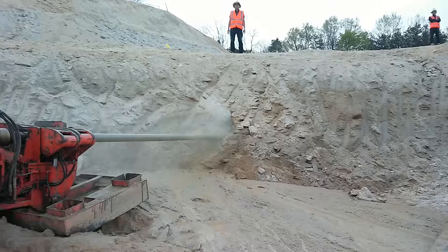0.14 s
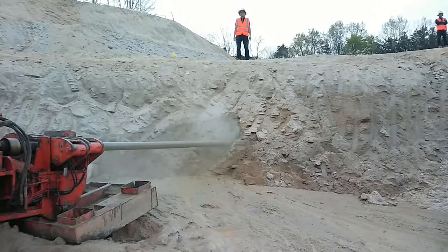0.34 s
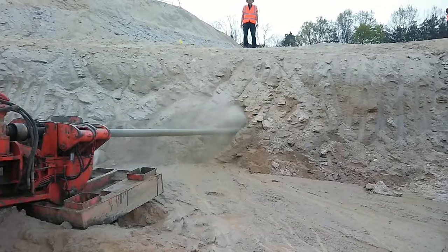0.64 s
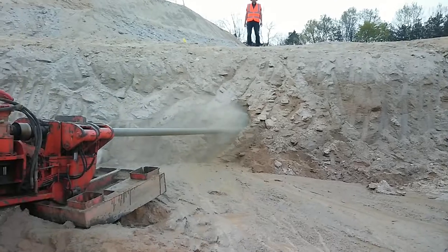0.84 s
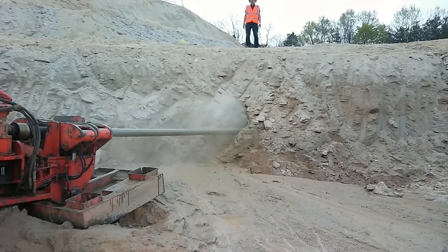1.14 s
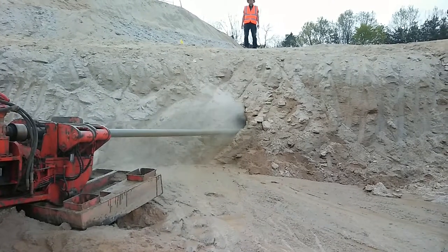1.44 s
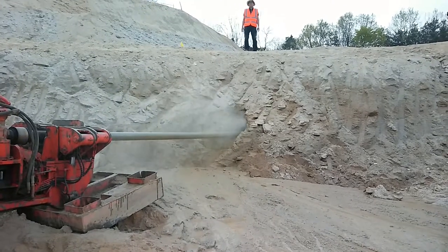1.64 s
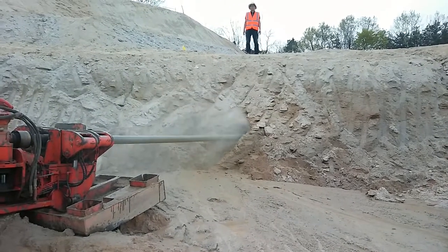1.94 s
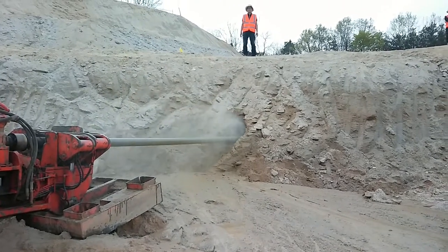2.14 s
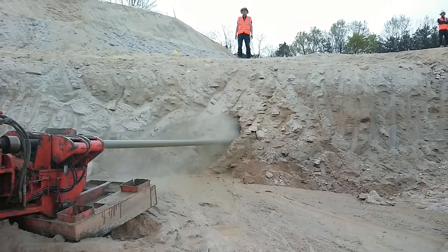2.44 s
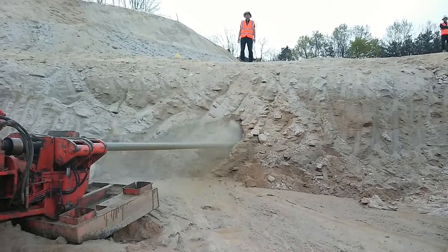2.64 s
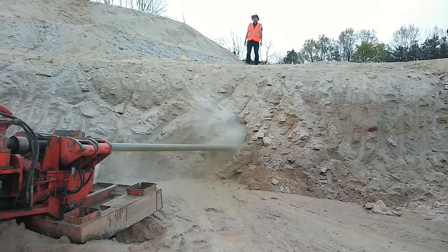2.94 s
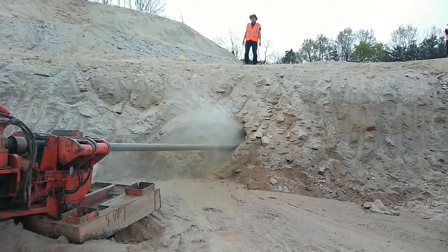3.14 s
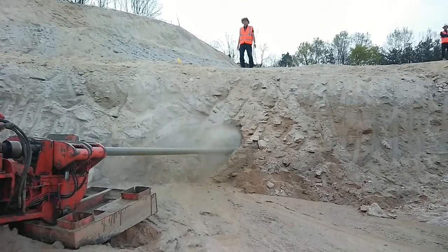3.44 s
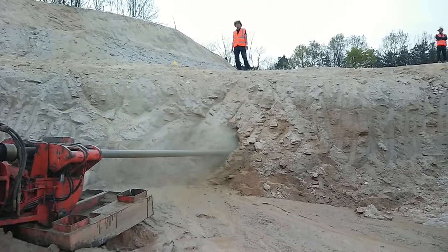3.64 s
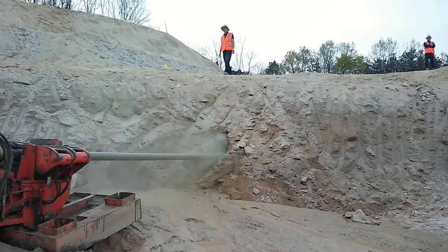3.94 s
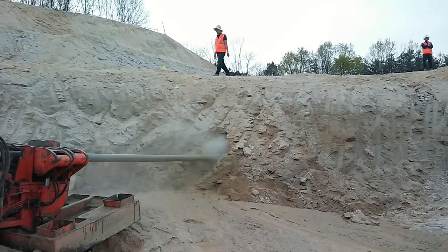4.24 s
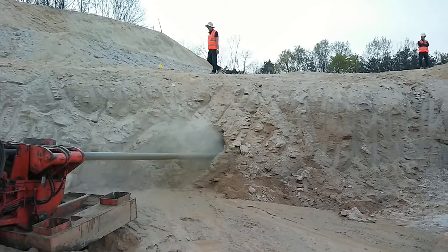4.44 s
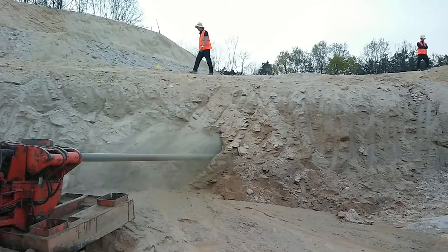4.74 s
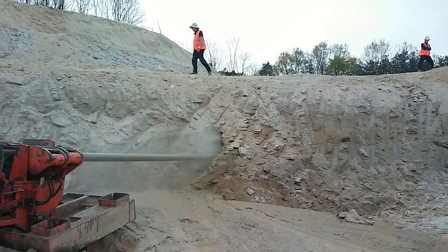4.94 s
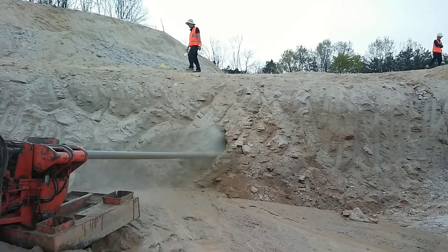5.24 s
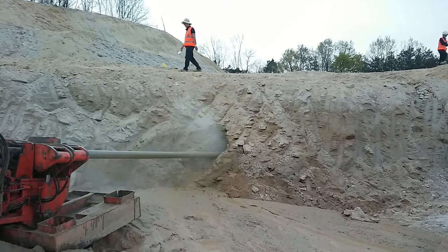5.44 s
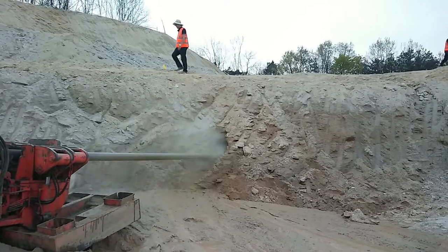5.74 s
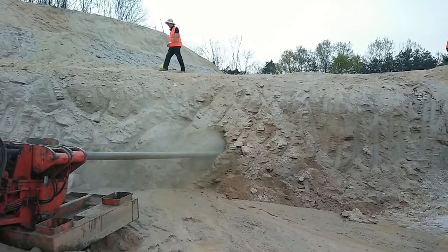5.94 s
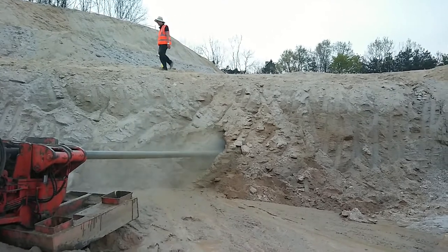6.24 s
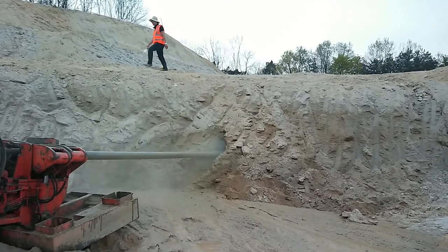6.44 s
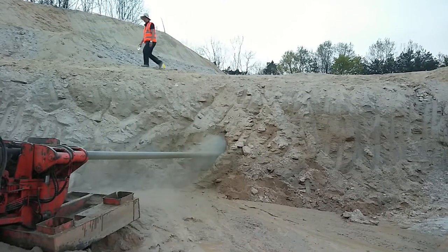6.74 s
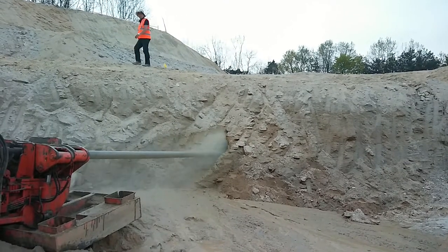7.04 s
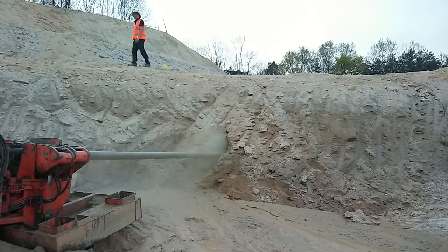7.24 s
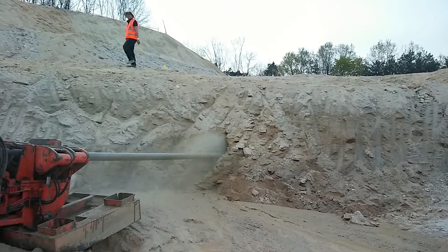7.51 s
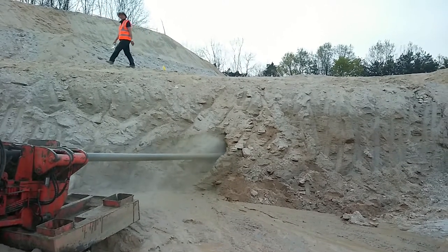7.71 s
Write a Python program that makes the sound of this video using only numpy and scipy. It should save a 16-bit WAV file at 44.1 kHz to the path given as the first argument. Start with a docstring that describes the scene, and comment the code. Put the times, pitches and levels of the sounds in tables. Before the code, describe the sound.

The sound cuts in abruptly: a steady blast of air and dust from a hole in a bank, hissing high and roaring in the middle, surging and choking irregularly. An engine hums low underneath. Midway, brief airy whistles and hoots slip out and sand sprays brighter; later fast, heavy piston knocks and booms fill the bass. Outdoor drilling, mono, loud and crowded, without an ending.

```python
"""A drilling rig blows dust out of a hole in a sand bank, heard by one microphone.
The sound cuts in with air hissing and roaring round the drill pipe: coloured noise that surges and chokes.
An engine drone and deep buffeting lie faintly under it and step up at about 0.4 s; short hoots come from 2.8 s.
At 5.35 s a piston machine starts to thump under load: each puff sets off a knock and a boom.
Throughout, a fast limiter briefly turns everything down round any peak above its ceiling."""
import sys
import numpy as np
from scipy import signal
from scipy.fft import rfft, irfft, next_fast_len
from scipy.io import wavfile
from scipy.ndimage import uniform_filter1d, minimum_filter1d, map_coordinates

SR = 44100
rng = np.random.default_rng(int(sys.argv[2]) if len(sys.argv) > 2 else 0)


def waveform_to_disk(signal):
    """Save audio, clipped to [-1, 1], as 16-bit WAV at the path in sys.argv[1]."""
    frames = np.transpose(np.atleast_2d(signal))
    scaled = np.clip(frames, -1, 1) * 32767
    samples = np.round(scaled).astype(np.int16)
    wavfile.write(sys.argv[1], SR, samples)


N = 347067

# Levels are rms in the mix, before random flutter, surges and the recorder.
# Colours are relative: each layer gets its level elsewhere.

START_S, BEFORE_START_DB = 0.101, -70  # the sound cuts in

# engine firing: (time [s], rate [Hz])
ENGINE_FIRING = [(0.4, 70.5), (5.27, 71), (6.38, 69.4)]
# engine drone: (time [s], level [dB])
ENGINE_LEVEL = [(.36, -25.5), (.4, -20), (2.7, -18.5), (3.6, -23), (5.6, -22), (6.1, -25.5), (7.87, -24)]

# piston machine speed: (time [s], rate [cycles per second])
PISTON_SPEED = [(5.35, 20.8), (5.6, 20), (5.8, 17.09), (6.1, 16.43), (6.45, 17.7), (6.9, 18.05),
                (7.35, 19.1), (7.55, 19.7), (7.87, 20.2)]
# piston machine under load: (time [s], knock level [dB], boom level [dB])
PISTON_LOAD = [(5.35, -30, -32), (5.57, -19, -24), (6.6, -20.5, -25.5), (7.22, -17.5, -20),
               (7.32, -19, -14), (7.87, -20, -15)]
# runs of harder (+) or softer (-) knocks: (middle time [s], length [s], peak change [dB])
KNOCK_STRAINS = [(5.69, 0.18, 7.5), (6.39, .1, 5), (6.53, .14, -8), (6.74, 0.15, 8), (6.88, .12, -14),
                 (7.04, .14, 4), (7.24, .16, -11)]
# colour of the knock: (frequency [Hz], relative level [dB])
KNOCK_COLOUR = [(25, -15), (70, -11), (140, 1.5), (230, -1), (300, -20.5), (500, -43), (1000, -68)]
# colour of the boom: (frequency [Hz], relative level [dB])
BOOM_COLOUR = [(15, -18), (35, -5), (70, -2.5), (105, 5), (160, -6), (300, -36.5), (700, -66)]

# air in the bore: (time [s], rumble level [dB], roar level [dB], roar's upper resonance against its lower [dB])
BORE_FLOW = [(.1, -21, -17.5, 1.5), (1, -20, -18, 1), (2.6, -20.5, -17.5, 2.5), (3.3, -20, -19.5, -0.5),
             (4.4, -22, -16, -3.5), (5.3, -23.5, -19, -0.5), (6.1, -23.5, -16, -0.5),
             (7.2, -21.5, -14.5, -4.5), (7.55, -22, -18, -5.5), (7.87, -22, -24.5, -16)]
# base levels between surges, before flutter; the buffeting is lower until its step up
HOWL_DB, BUFFET_DB = -22, -27.5
BUFFET_START_S, BUFFET_RISE_DB = 0.41, 15  # the deep buffeting steps up about when the drone does
# colour of the deep buffeting: (frequency [Hz], relative level [dB per Hz])
BUFFET_COLOUR = [(10, -12), (25, 2), (38, 1), (55, 1), (100, 0), (140, -15), (300, -52)]
# colour of the rumble: (frequency [Hz], relative level [dB per Hz])
RUMBLE_COLOUR = [(40, -20), (90, 3), (140, 0.5), (180, 5), (260, 0), (380, -1), (480, 0), (600, -2.5),
                 (700, -8.5), (900, -12.5), (1500, -60)]
# colour of the roar's lower resonance: (frequency [Hz], relative level [dB per Hz])
LOWER_ROAR_COLOUR = [(600, -34), (760, -14), (860, -3), (960, 1.5), (1130, 0.5), (1280, -5), (1700, -45)]
# colour of the roar's upper resonance: (frequency [Hz], relative level [dB per Hz])
UPPER_ROAR_COLOUR = [(850, -29), (1130, -12), (1350, 1), (1500, -3), (1680, -4.5), (1900, -12), (2600, -51)]
# colour of the howl: (frequency [Hz], relative level [dB per Hz])
HOWL_COLOUR = [(1500, -42), (1800, -6), (2050, 1), (2250, -1.5), (2550, -1.5), (2850, -15.5), (3600, -53)]

# the flow surges (+) or chokes (-): (middle time [s], length [s], peak change [dB], main pitch [Hz])
AIR_SURGES = [(.33, 0.24, 2.5, 500), (1.163, 0.29, -3, 1350), (1.752, 0.33, 2, 1100),
              (2.76, 0.13, -3.5, 750), (3.0, 0.09, 2.5, 4500), (3.26, .16, 1.5, 400),
              (3.35, 0.31, -3.5, 2000), (3.5, .18, 2, 300), (3.59, .14, 2.5, 1200), (3.79, 0.18, -4, 1250),
              (4.03, 0.2, -5.5, 300), (4.2, .22, 7, 600), (4.36, .16, 3, 2200), (4.48, 0.084, 4, 1200),
              (4.674, 0.21, -4, 2000), (5.06, 0.2, -4, 1200), (5.31, 0.21, 4.5, 430), (5.45, .1, 2.5, 1050),
              (5.523, .26, 11, 35), (5.673, .24, -7, 1590), (6.602, .3, -3, 400), (6.9, .1, 2.5, 1100),
              (7.73, 0.091, 2, 2205)]
SURGE_REACH_OCT = 0.75  # this far from its pitch a surge has half its dB
# where each layer of the air sound is centred, for the surges
BUFFET_HZ, RUMBLE_HZ, ROAR_HZ, UPPER_ROAR_HZ, HOWL_HZ, HISS_HZ = 38, 380, 1000, 1400, 2220, 4380
HISS_TRADE = 0.18  # dB that the hiss loses for each dB that the roar surges

# short hoots of air squeezing past the pipe:
# (middle time [s], length [s], middle pitch [Hz], whole glide [octaves], peak level [dB])
AIR_HOOTS = [(2.899, .18, 1010, 0.094, -17.5), (3.209, .11, 1040, 0.024, -15.5),
             (3.26, 0.14, 492, -0.014, -20.5), (3.5, 0.17, 199.7, 0.032, -17.5),
             (3.562, 0.18, 960, 0.0081, -18), (3.622, 0.22, 1438, 0.26, -20), (3.8, .28, 2280, .22, -22.5),
             (4.184, 0.082, 950, 0.14, -21), (4.486, 0.098, 1406, 0, -20),
             (4.771, 0.091, 990, 0.013, -17.5), (4.901, 0.12, 1470, 0, -19), (4.9, 0.086, 2100, 0, -23),
             (6.1, .14, 4680, -0.049, -16), (6.3, .14, 4870, -.12, -18), (6.54, .12, 5100, 0, -21),
             (7.721, 0.17, 2030, 0.0027, -21.5)]

# air leaving the hole, before the gap colours it: (time [s], hiss level [dB], sand spray level [dB])
JET_LEVELS = [(0.1, -12.5, -22.5), (0.5, -13.5, -28), (1.0, -11.2, -26), (3.06, -13, -27),
              (3.3, -15, -16.5), (4.2, -15, -19), (5.1, -15, -16.5), (6.2, -14.5, -22), (7.45, -17.5, -26),
              (7.87, -16, -34)]
# colour of the hiss: (frequency [Hz], relative level [dB per Hz])
HISS_COLOUR = [(1530, -43), (2600, -8), (2760, -2), (3000, -5), (3750, 0.5), (5450, 0), (6000, -6),
               (6660, -11), (7290, -29), (7850, -18.5), (8850, -33), (9460, -46.5), (11000, -45.5),
               (12500, -43), (15500, -61)]
# colour of the sand spray: (frequency [Hz], relative level [dB per Hz])
SPRAY_COLOUR = [(3290, -37), (5600, 0), (6180, -1), (6870, -1), (7260, -5), (7540, -5), (8320, -7.5),
                (9100, -14.5), (9620, -21.5), (11400, -24.5), (13000, -23.5), (15500, -32)]
# peaks and notches of the gap round the pipe: (frequency [Hz], width at half the dB [Hz], gain [dB])
GAP_RESONANCES = [(2810, 200, -1.5), (3390, 140, 1.5), (4650, 690, 1.5), (5380, 170, -1.5), (5770, 130, 2),
                  (6020, 150, 0.5), (6610, 130, 4.5), (6800, 130, -1), (7070, 190, 5.5)]
# how far the gap colours the air: (time [s], share [0-1])
GAP_SHARE = [(3, 1), (3.6, .5), (5.3, 1)]

TOP_HZ = 15700  # the recorder cuts everything above this


def amp(db):
    """Turn decibels into a gain."""
    return 10 ** (np.asarray(db) / 20)


def unit(x):
    """Scale a sound to rms 1."""
    return x / np.sqrt(np.mean(x ** 2) + 1e-20)


def along(points, hz):
    """Read (Hz, value) points at any frequency, on a log axis."""
    f, v = np.transpose(points)
    return np.interp(np.log(hz + 1), np.log(f + 1), v)


def curves(rows):
    """Give one value per sample for each column after the time."""
    s, *cols = np.transpose(rows)
    return [np.interp(np.arange(N) / SR, s, c) for c in cols]


def wobble(rate):
    """A smooth random curve with this many random points a second."""
    knots = rng.standard_normal(int(N * rate / SR) + 4)
    return map_coordinates(knots, [np.arange(N) * rate / SR])


def swells(rows):
    """dB per sample of (middle, length, dB) swells, each a rounded arch."""
    t, out = np.arange(N) / SR, np.zeros(N)
    for middle, length, db in rows:
        inside = slice(*np.searchsorted(t, [middle - length / 2, middle + length / 2]))
        out[inside] += db * np.cos(np.pi * (t[inside] - middle) / length)
    return out


def filtered(x, response):
    """Multiply the spectrum of x by a response of frequency."""
    m = next_fast_len(N + SR // 2)
    hz = np.fft.rfftfreq(m, 1 / SR)
    return irfft(rfft(x, m) * response(hz), m)[:N]


def struck(x, spectrum, size=16384):
    """Let each click in x ring with this colour, never before the click."""
    hz = np.fft.rfftfreq(size, 1 / SR)
    # folding the cepstrum (spectrum of the log spectrum) forward makes the ringing follow the click
    cepstrum = irfft(np.log(amp(along(spectrum, hz))))
    cepstrum[1:size // 2] *= 2
    cepstrum[size // 2 + 1:] = 0
    ringing = irfft(np.exp(rfft(cepstrum)))
    return signal.fftconvolve(x, ringing)[:N]


def eddies(patchy_db):
    """Turbulent noise: patches in time and pitch swell and fade."""
    z = signal.stft(rng.standard_normal(N), nperseg=512)[2]
    field = rng.standard_normal(z.shape)
    for _ in range(2):
        field = uniform_filter1d(field, size=3, axis=0)  # across pitch
        field = uniform_filter1d(field, size=14, axis=1)  # across time
    return signal.istft(z * amp(patchy_db * unit(field)), nperseg=512)[1][:N]


def rush(spectrum, patchy_db):
    """Rushing air: coloured turbulence of rms 1."""
    return unit(filtered(eddies(patchy_db), lambda hz: amp(along(spectrum, hz))))


def surging(centre_hz):
    """dB that the surges add to a layer of air: the nearer their pitch, the more."""
    rows = []
    for middle, length, db, hz in AIR_SURGES:
        octaves = np.log2(hz / centre_hz)
        rows.append((middle, length, db * .5 ** ((octaves / SURGE_REACH_OCT) ** 2)))
    return swells(rows)


def engine():
    """The exhaust drones at the firing rate, with weak tones an octave below and above."""
    phase = 2 * np.pi * np.cumsum(curves(ENGINE_FIRING)[0]) / SR
    tone = np.sin(phase) + amp(-15) * np.sin(phase / 2) + amp(-18) * np.sin(2 * phase)
    (drone_db,) = curves(ENGINE_LEVEL)
    return amp(drone_db + 0.59 * wobble(12)) * unit(tone)


def pistons():
    """Each cycle gives a heavy puff and, just before its middle, a lighter one; both knock and boom."""
    running = np.arange(N) / SR >= PISTON_SPEED[0][0]
    cycles = np.cumsum(curves(PISTON_SPEED)[0] * running) / SR
    turns = np.arange(int(cycles[-1]))
    chance = rng.standard_normal((len(turns), 3))  # heavy strength, light timing, light strength
    heavy, light = np.zeros(N), np.zeros(N)
    heavy_at = np.searchsorted(cycles, turns, side="right")
    heavy[heavy_at] = amp(1.7 * chance[:, 0])
    light_at = np.searchsorted(cycles, turns + np.clip(.46 + .01 * chance[:, 1], .1, .9))
    light[light_at] = amp(2.0 * chance[:, 2])
    knock = struck(heavy + 0.32 * light, KNOCK_COLOUR)
    boom = struck(heavy + 0.88 * light, BOOM_COLOUR)
    knock /= np.std(knock[running])
    boom /= np.std(boom[running])
    knock_db, boom_db = curves(PISTON_LOAD)
    # the minus signs turn both waves upside down
    return -amp(knock_db + swells(KNOCK_STRAINS)) * knock - amp(boom_db) * boom


def bore():
    """Air surges along the hole: deep buffeting, a rumble, a roar of two resonances and a higher howl."""
    rumble_db, roar_db, upper_db = curves(BORE_FLOW)
    flutter = wobble(35)
    rattle = wobble(110)  # grit chops the flow

    rumble_db = rumble_db + surging(RUMBLE_HZ) + 1.0 * wobble(30)
    rumble = amp(rumble_db) * rush(RUMBLE_COLOUR, patchy_db=1.5)

    lower = amp(surging(ROAR_HZ)) * rush(LOWER_ROAR_COLOUR, patchy_db=1.5)
    upper = amp(surging(UPPER_ROAR_HZ) + upper_db) * rush(UPPER_ROAR_COLOUR, patchy_db=2.0)
    # dividing by the joint strength keeps the roar's level where the table puts it
    both = (lower + upper) / np.sqrt(1 + amp(upper_db) ** 2)
    roar = amp(roar_db + 0.94 * flutter + 0.99 * rattle) * both

    howl_db = HOWL_DB + surging(HOWL_HZ) + 0.58 * flutter + 1.2 * rattle
    howl = amp(howl_db) * rush(HOWL_COLOUR, patchy_db=2.14)

    waiting = np.arange(N) / SR < BUFFET_START_S
    buffet_db = BUFFET_DB - BUFFET_RISE_DB * waiting + surging(BUFFET_HZ) + 1.8 * wobble(14)
    buffet = amp(buffet_db) * rush(BUFFET_COLOUR, patchy_db=2.5)
    return rumble + roar + howl + buffet


def hoots(width_hz):
    """Air squeezing past the pipe hoots: narrow bands of noise swell, glide and fade."""
    out = np.zeros(N + SR)
    lowpass = signal.butter(2, width_hz / 2, fs=SR, output="sos")
    for middle, length, hz, glide, db in AIR_HOOTS:
        u = np.linspace(-.5, .5, int(length * SR))  # from start to end of the hoot
        flutter = signal.sosfilt(lowpass, rng.standard_normal((2, SR)))[:, -len(u):]
        phase = 2 * np.pi * np.cumsum(hz * 2 ** (glide * u)) / SR
        # slow noise on a cosine and a sine makes a narrow band round the pitch
        band = unit(flutter[0] * np.cos(phase) + flutter[1] * np.sin(phase))
        first = int((middle - length / 2) * SR)
        out[first:][:len(u)] += amp(db) * np.cos(np.pi * u) * band
    return out[:N]


def gap(f):
    """Gain of the gap round the pipe, which lifts some pitches and weakens others."""
    return amp(sum(db * .5 ** (((f - hz) / (width / 2)) ** 2) for hz, width, db in GAP_RESONANCES))


def jet():
    """The blast hisses out round the pipe and carries a spray of sand; the gap colours both."""
    hiss_db, spray_db = curves(JET_LEVELS)
    hiss_db = hiss_db + surging(HISS_HZ) - HISS_TRADE * surging(ROAR_HZ)
    hiss = amp(hiss_db) * rush(HISS_COLOUR, patchy_db=1.5)
    spray = amp(spray_db) * rush(SPRAY_COLOUR, patchy_db=1.14)
    blast = hiss + spray
    share = np.clip(curves(GAP_SHARE)[0], 0, 1)
    coloured = (1 - share) * blast + share * filtered(blast, gap)
    flutter_db = 0.26 * wobble(9) + 0.63 * wobble(22) + 1.13 * wobble(130)
    return coloured * amp(flutter_db)


def scene():
    """Add up all sources at one microphone, the same in both channels."""
    mono = engine() + pistons() + bore() + hoots(width_hz=133) + jet()
    mono = mono * np.where(np.arange(N) / SR < START_S, amp(BEFORE_START_DB), 1)
    return np.array([mono, mono])


def limited(x, ceiling, hold):
    """The gain drops just ahead of each peak above the ceiling and soon comes back; hold is in seconds."""
    needed = np.minimum(1, ceiling / (np.abs(x) + 1e-9))
    span = max(2, int(hold * SR))
    gain = uniform_filter1d(minimum_filter1d(needed, span), span)
    return x * gain


def record(dry):
    """The recorder lifts the level a little, limits the peaks, then cuts the top of the treble."""
    mono = limited(dry[0] * amp(1.14), ceiling=1.0, hold=0.0056)
    mono = filtered(mono, lambda hz: hz < TOP_HZ)
    return np.array([mono, mono])


dry = scene()
out = record(dry)
waveform_to_disk(out)
```